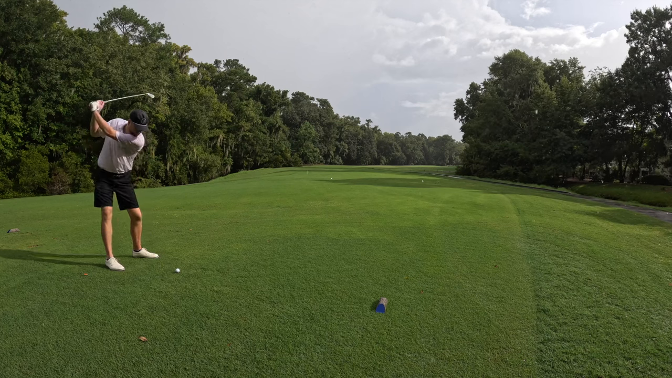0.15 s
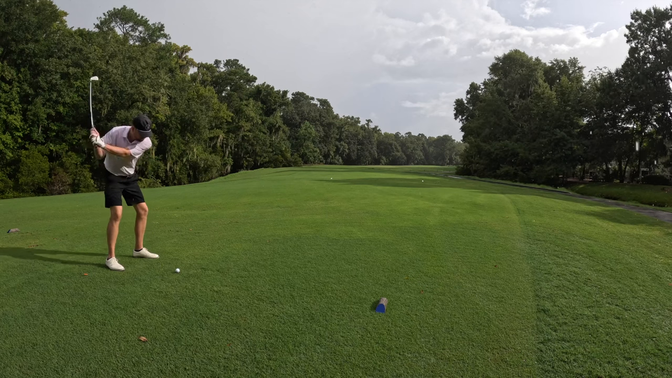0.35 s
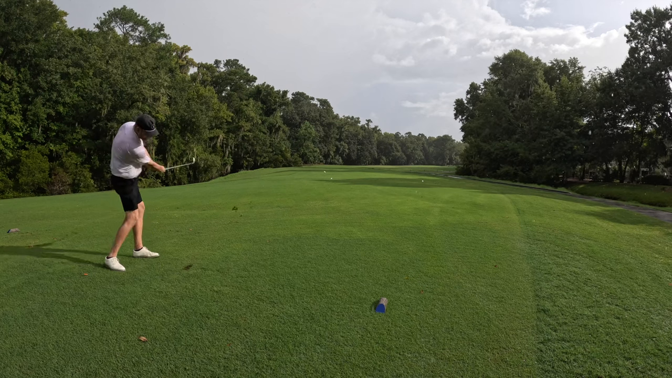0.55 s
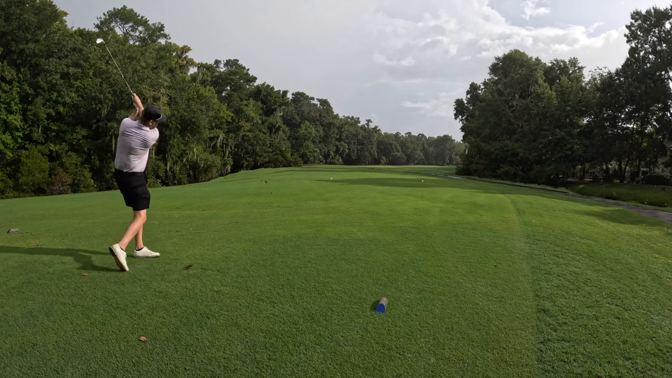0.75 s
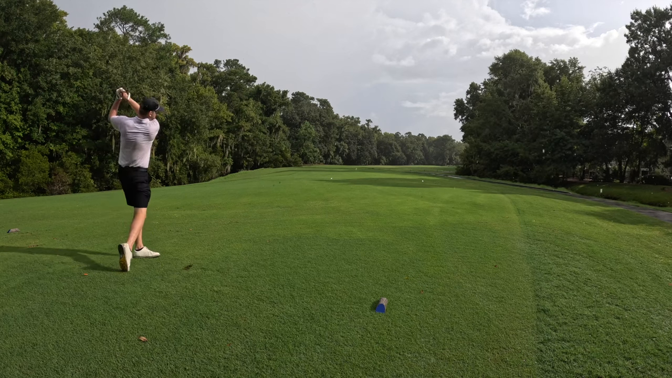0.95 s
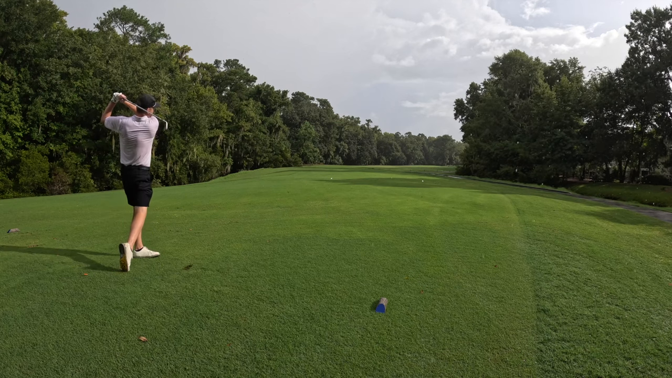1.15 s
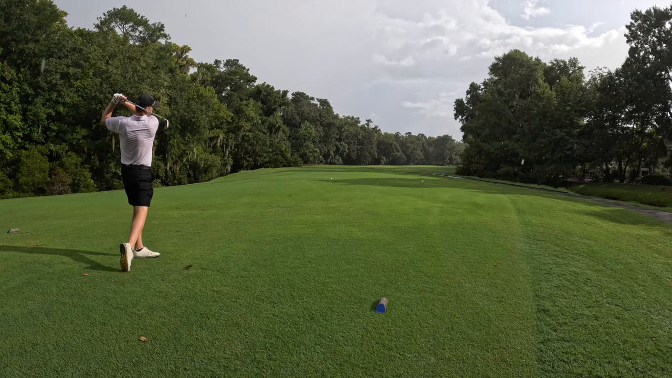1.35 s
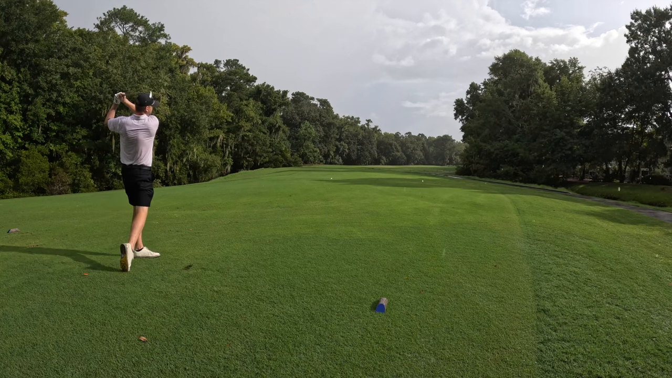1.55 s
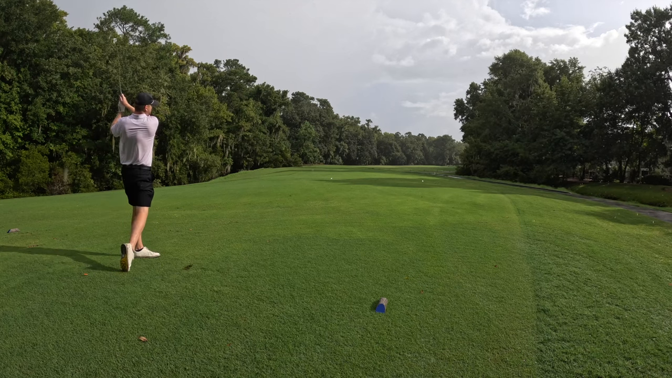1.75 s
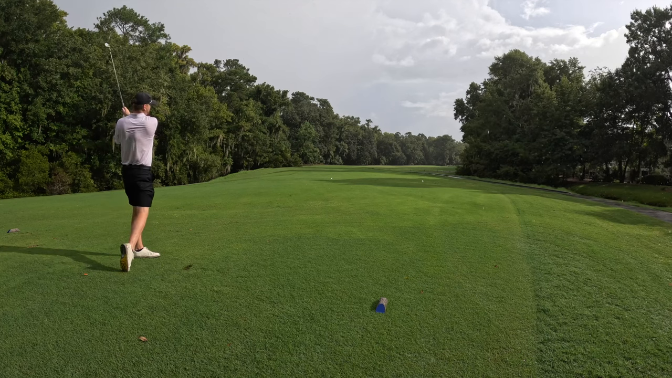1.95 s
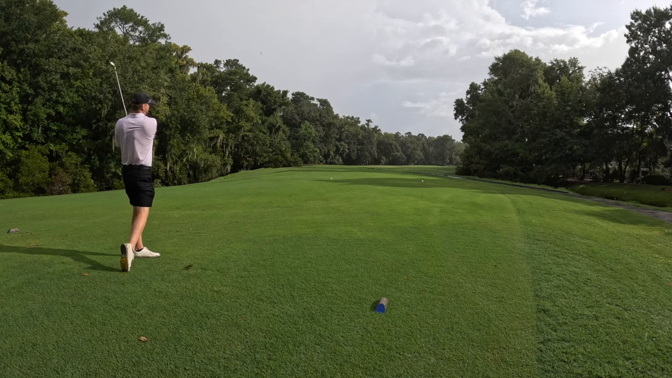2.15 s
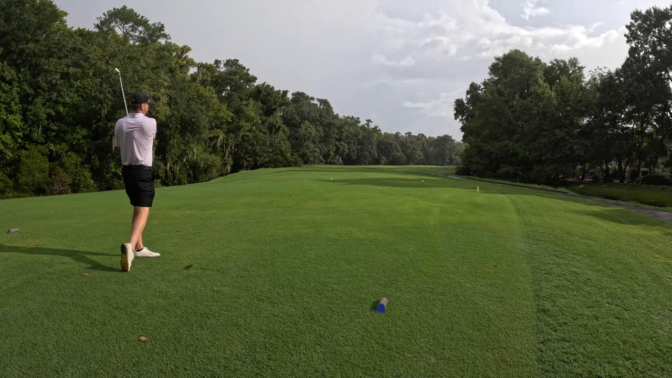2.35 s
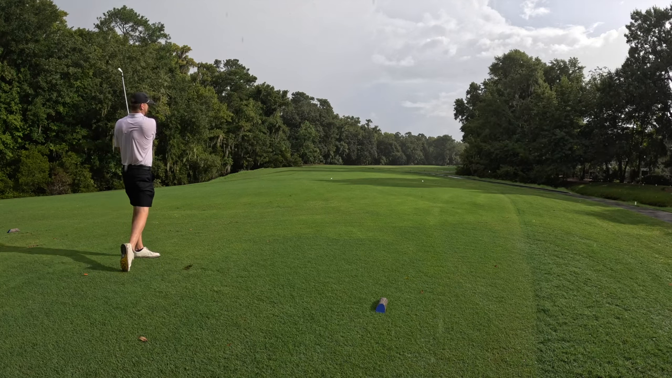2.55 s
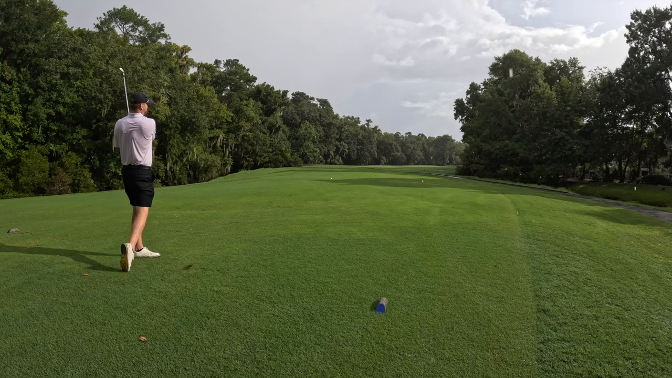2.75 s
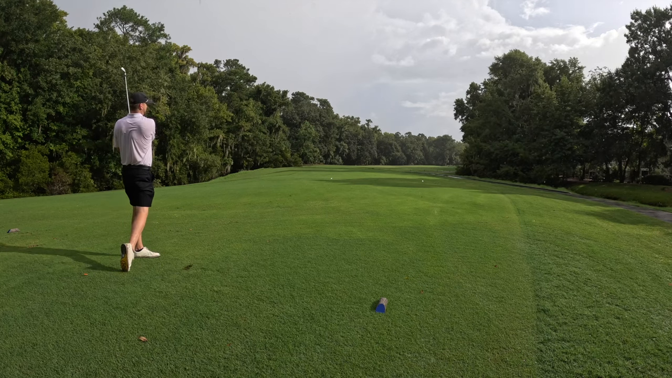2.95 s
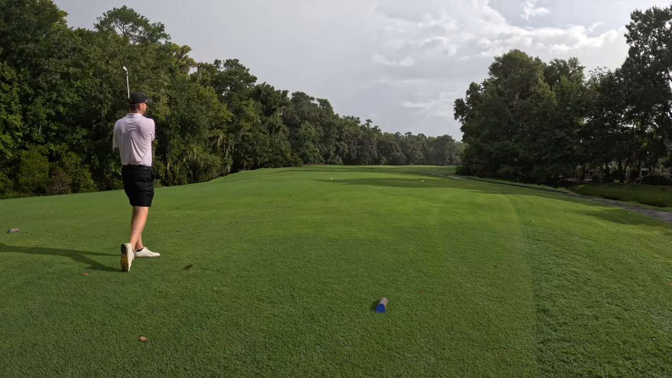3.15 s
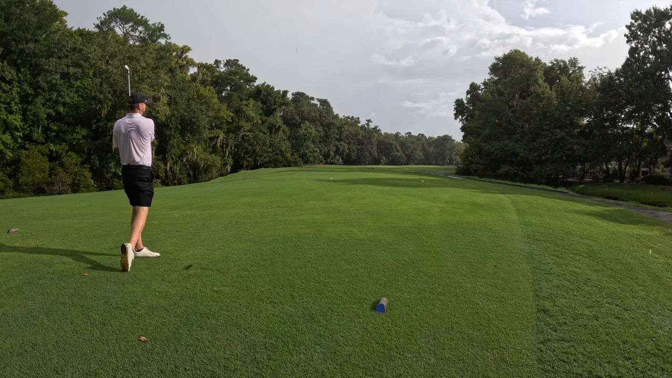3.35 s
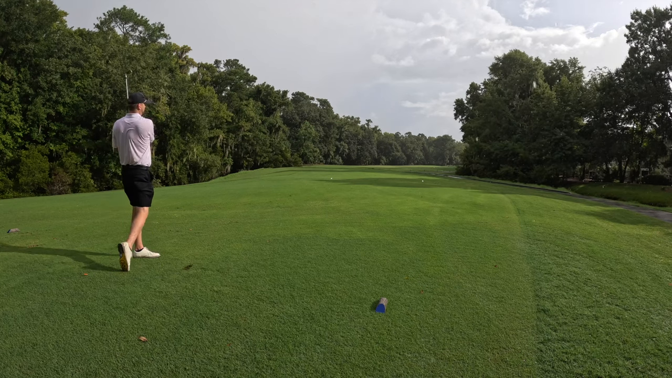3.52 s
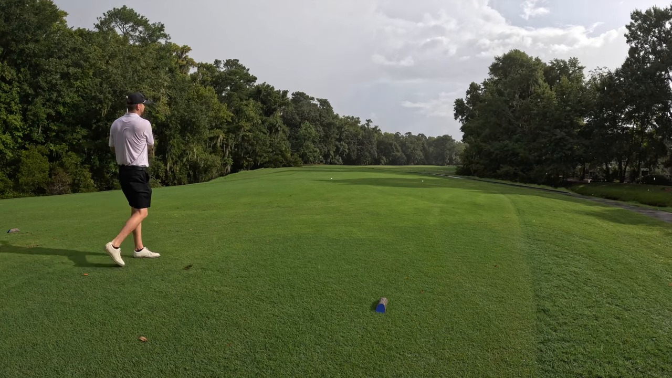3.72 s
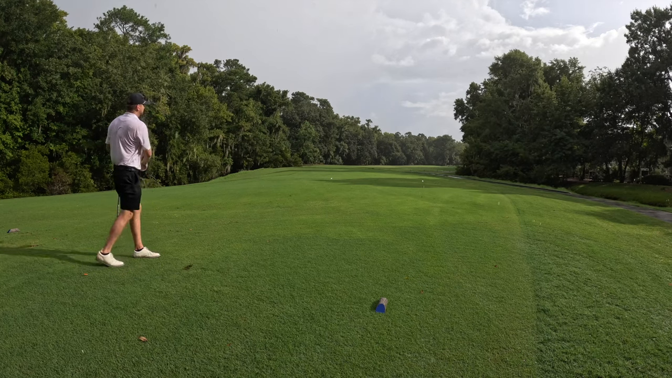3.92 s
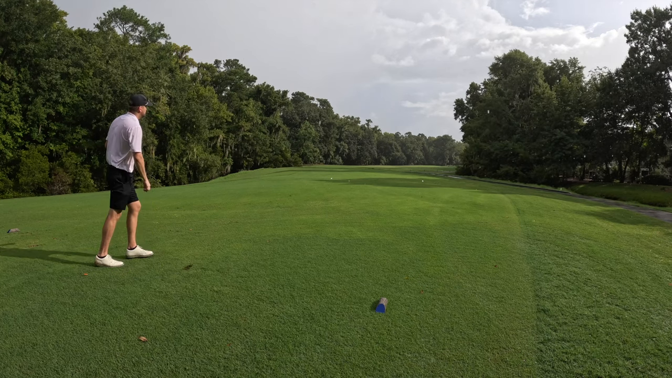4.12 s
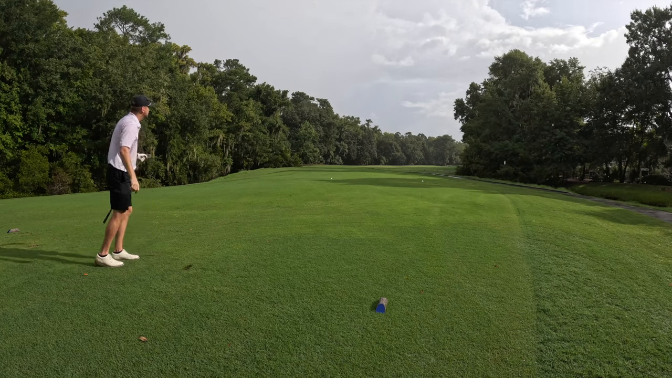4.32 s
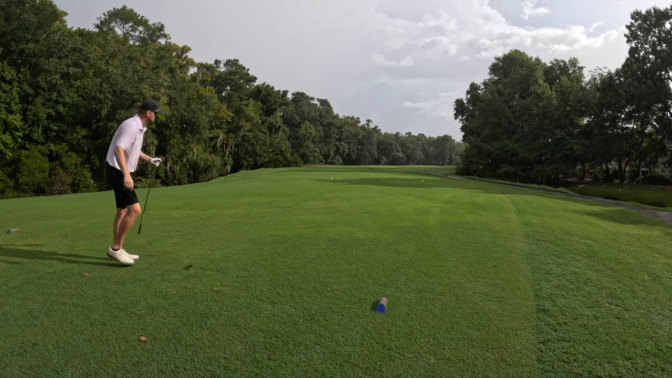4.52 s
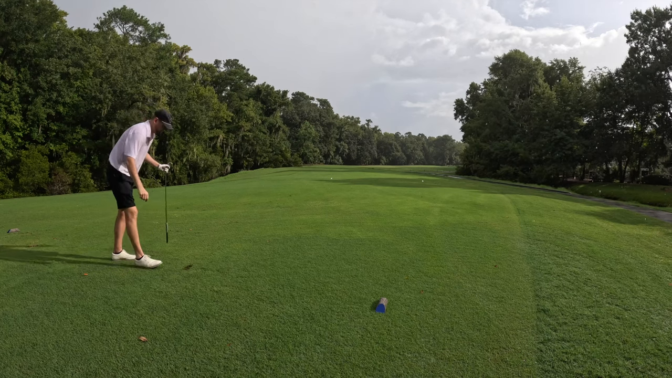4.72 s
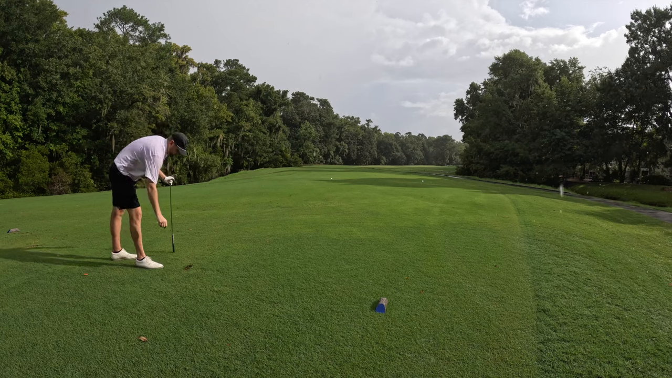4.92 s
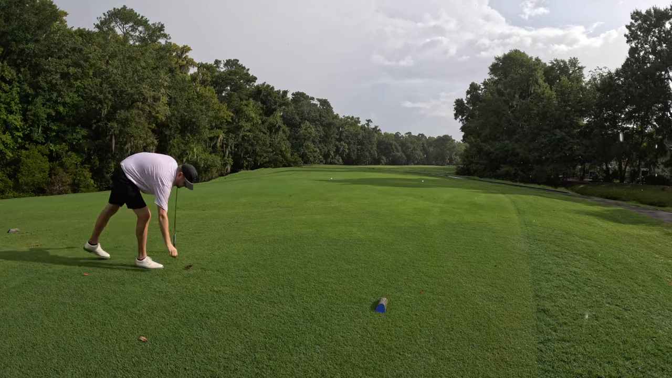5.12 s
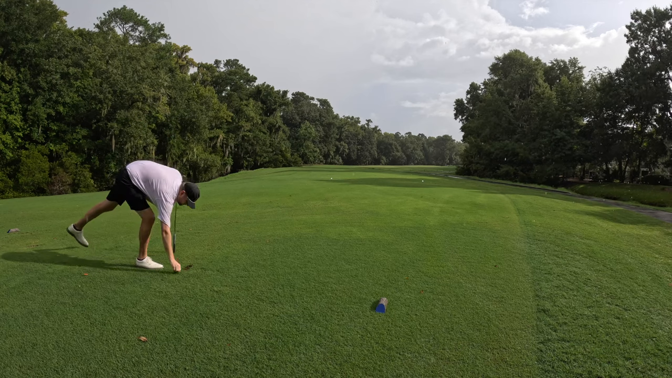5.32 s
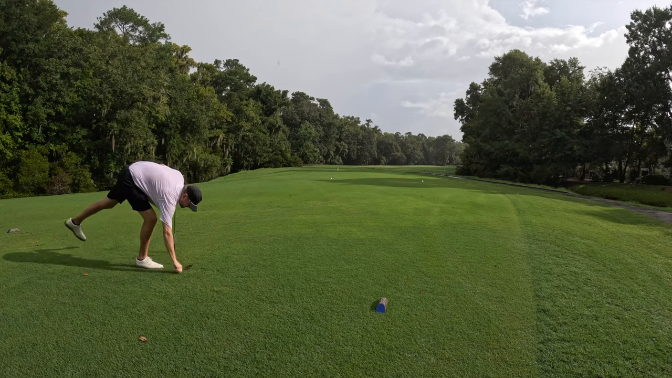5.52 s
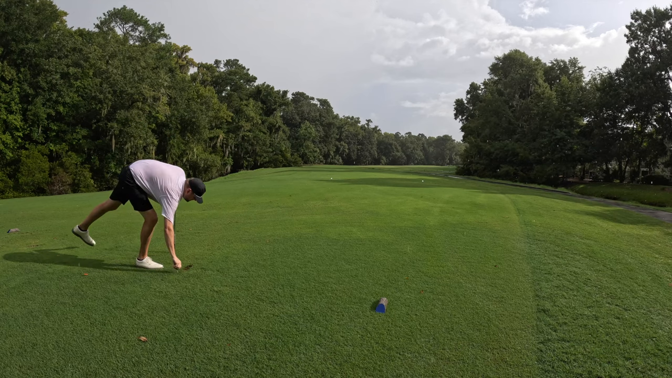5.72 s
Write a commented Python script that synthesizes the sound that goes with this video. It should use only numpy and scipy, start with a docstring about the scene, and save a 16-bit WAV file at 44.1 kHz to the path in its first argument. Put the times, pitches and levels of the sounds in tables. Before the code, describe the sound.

A golf club's quick swish and sharp strike echo off trees, over a low rumble, hissing leaves and faint birds.

```python
"""A golf tee shot on a tree-lined course, over a far rumble and the hiss of leaves.
A small bird chirps, a far crow caws, something ticks faintly. The iron whistles down, shedding
vortices; at 0.57 s its face cracks on the ball, the turf thumps and the trees throw the crack back.
The crow caws again. Scattered ticks, chirps and soft rustles follow.
From 4.7 s come dull thumps, as of feet on turf."""
import sys
import numpy as np
from scipy import signal
from scipy.fft import rfft, irfft
from scipy.io import wavfile
from scipy.ndimage import uniform_filter1d, minimum_filter1d

SR = 44100
rng = np.random.default_rng(int(sys.argv[2]) if len(sys.argv) > 2 else 0)


def materialize(psi):
    """Save the field psi as 16-bit PCM at rate SR to the path in sys.argv[1].

    A 1-D psi becomes a single channel; in a 2-D psi each row is a channel.
    """
    bounded = np.clip(np.atleast_2d(psi).T, -1, 1)
    quanta = np.round(bounded * 32767).astype(np.int16)
    wavfile.write(sys.argv[1], SR, quanta)


N = 254456
TIME_S, FREQS_HZ = np.arange(N) / SR, np.fft.rfftfreq(N, 1 / SR)
STRIKE_S = 0.5719

# Source spectra. Each row: frequency in Hz, relative level in dB.
RUMBLE_SPECTRUM = [(8.8, -36), (15, -8), (38, 0), (86, -1), (98, -4), (119, -7), (189, -11.5), (228, -25),
                   (300, -22.5), (390, -42), (660, -120)]
LEAF_SPECTRUM = [(120, -36), (200, 1), (223, -1.5), (294, -8), (322, -6), (394, -8.5), (432, -7),
                 (763, -8.5), (1040, -4), (2130, -8.5), (2290, -8.5), (7410, -17), (8250, -24),
                 (9700, -26.5), (11100, -38.5), (12400, -34.5), (15000, -44), (16000, -61)]
THROAT_SPECTRUM = [(300, -35), (650, -17), (1000, -5.5), (1230, 3), (1450, 2.5), (1780, 4), (2050, -40),
                   (2550, -30), (3000, -12), (3250, -16), (3560, -8.5), (3850, -20), (4300, -25),
                   (4900, -9), (5500, -11), (8000, -31), (11000, -60)]
TICK_SPECTRUM = [(2000, -10), (7300, 0), (10500, -14), (12500, -7), (16000, -26)]
SHAFT_SPECTRUM = [(150, -12), (500, 3.5), (1000, 6.5), (1600, 1), (2600, -3.5), (4000, -7.5),
                  (6500, -10.5), (9500, -20.5), (12000, -42), (16000, -48)]
GRASS_SPECTRUM = [(200, 10.5), (800, 2), (1500, 1), (2500, -5), (3500, 0), (5200, -4), (6300, 2),
                  (7200, -1), (9500, -2), (11500, -17), (15000, -24)]
EARTH_SPECTRUM = [(50, -8), (110, 5), (200, 9), (340, 1), (550, -32), (2000, -40), (8000, -90)]
ECHO_SPECTRUM = [(200, -1), (600, -1), (1500, 2), (2800, -3), (4300, 0), (5400, 1), (7000, -4.5),
                 (10000, -13), (12000, -26), (15000, -30)]
ECHO_TREBLE = [(5000, -40), (8500, -8), (11500, 0)]
RUSTLE_SPECTRUM = [(300, 4), (1200, 3), (4000, -11), (12000, -46)]
SCUFF_SPECTRUM = [(100, -4), (290, -1), (470, 0), (600, -1), (750, -26), (1000, -11), (1400, -16.5),
                  (3000, -28), (8000, -44), (14000, -70)]
CRUMBLE_SPECTRUM = [(40, -12), (70, 2), (110, 3), (195, 2.5), (300, -5.5), (400, -14.5), (1000, -43),
                    (4000, -80)]
# Rumble swells. Each row: centre in seconds, half-width in seconds, level in dB, band centre in Hz.
RUMBLE_SWELLS = [(1.713, .08, -45.5, 42), (2.55, 0.33, -53.5, 80), (3.35, .2, -51.5, 92),
                 (4.093, .14, -49.5, 88)]
# Band of a swell. Each row: ratio to the band centre, level in dB.
SWELL_BAND = [(0.25, -50), (0.5, -12), (1, 0), (2, -20), (4, -70)]
# Birds. Each row: start and length in seconds, relative level in dB, first, middle and last pitch in Hz.
BIRD_CHIRPS = [(.015, 0.025, -60, 7100, 6980, 6600), (1.523, 0.029, -54, 5700, 7470, 8000),
               (2.145, 0.013, -53, 5900, 7100, 7840), (3.67, 0.095, -57.5, 7400, 7500, 7520),
               (3.75, 0.047, -55.5, 7500, 7750, 8000), (3.792, 0.011, -56, 7900, 7600, 7300),
               (3.876, 0.037, -53.5, 7350, 7130, 6900), (3.895, 0.065, -51.5, 7170, 7180, 7100),
               (3.947, .02, -55, 7000, 6700, 6500), (4.736, .035, -58, 7000, 7600, 7540)]
# Crow. Each row: start and length in seconds, level in dB, base pitch in Hz, roughness from 0 to 1.
CROW_CAWS = [(0.085, .115, -44, 616.5, 0.05), (0.714, 0.124, -44, 613, 0)]
# Ticks. Each row: start in seconds, gain in dB, relative level of the lower mode in dB.
DRY_TICKS = [(.391, -52, 6), (1.482, -43, 3), (2.608, -40, -2), (2.811, -44, 1.5), (4.397, -49, -12),
             (4.596, -40, 2.5), (4.907, -46, -8), (4.924, -47, -8), (5.538, -43.5, 2.5)]
# Club face snapping, ball springing back. Each row: frequency in Hz, level in dB, rise in seconds.
FACE_MODES = [(2780, -1, 0.00019), (5430, 2, 0.00028), (7060, 1.5, 0.0004), (8740, -5, 0.0003),
              (10200, -14, 0.00044), (12240, -15.5, 0.00033), (14100, -22.5, 0.00027)]
BALL_MODES = [(1380, 3.5, 0.0002)]
# Head and ball ringing on. Each row: frequency in Hz, relative level in dB, T60 in seconds.
RING_MODES = [(947, -9, .035), (1265, -.5, .025), (1700, 0, .026), (1830, -3, .02), (1960, 0, .022),
              (2460, -1, .028), (2860, -6, .03), (3110, -7, .022), (4010, -1, .025), (4270, -4, .028),
              (4760, -5, .022), (4990, 1, .026), (5430, -5, .02), (6982, -2, .026), (7500, -7, .028),
              (9130, -4, .022)]
# Turf giving way, sole slapping it. Each: level in dB, first and last Hz, glide and rise in seconds.
TURF_THUD = (-22.5, 280, 112, .006, .009)
SOLE_SLAP = (-19, 460, 250, .006, .0027)
# Rustles. Each row: start in seconds, level in dB, rise in seconds.
SOFT_RUSTLES = [(2.81, -44.5, 0.0034), (3.075, -47, 0.004), (5.054, -49.5, 0.0075), (5.43, -41.5, .0035),
                (5.617, -48, .005)]
# Thumps. Each row: start in seconds, level in dB, relative scuff level in dB,
# thud lag and rise in seconds, last pitch in Hz.
DULL_THUMPS = [(4.682, -34.5, -4, 0.001, .016, 150.7), (4.953, -47.5, -1.5, 0.0019, 0.013, 218),
               (5.427, -30, -9.5, 0.015, 0.0058, 148), (5.469, -38.5, -12, 0.00094, 0.0054, 170),
               (5.491, -29, -13.5, 0.002, 0.007, 128), (5.528, -40.5, -12, .001, .005, 175),
               (5.615, -46.5, -2.5, 0.0021, 0.0066, 211)]
# Diffuse sound. Each row: frequency in Hz, left-right coherence from 0 to 1.
DIFFUSE_COHERENCE = [(60, 1), (130, 0.96), (290, 0.89), (640, 0.77), (1410, 0.65), (3100, 0.46), (6820, 1),
                     (15000, 0.22)]
# Balance of diffuse sound and of sound from the tee. Each row: frequency in Hz, left minus right in dB.
DIFFUSE_LEAN_DB = [(60, -0.5), (150, -1.5), (380, -1), (950, 1.0), (2380, 1.5), (5980, -0.5), (15000, 6.5)]
TEE_LEAN_DB = [(60, -1), (200, -1), (1300, 0), (7100, 2), (8300, -3), (10300, 1), (12500, 6)]
# Phase of sound from the tee. Each row: frequency in Hz, lead of the left channel in radians.
TEE_PHASE_RAD = [(1000, 0.23), (4000, -0.42), (5900, -0.48), (7200, -0.39), (9000, -0.53), (11000, -0.13)]


def amp(db):
    """Decibels to gain."""
    return 10 ** (np.asarray(db) / 20)


def unit(x):
    """Scales to rms 1."""
    return x / np.sqrt(np.mean(x ** 2) + 1e-20)


def per_bin(table):
    """A table interpolated at each FFT bin, in log frequency."""
    hz, value = np.transpose(table)
    return np.interp(np.log(FREQS_HZ + 1), np.log(hz + 1), value)


def add(mix, start_s, sound):
    """Mixes a sound in."""
    part = mix[max(round(start_s * SR), 0):][:len(sound)]
    part += sound[:len(part)]


def colour(x, spectrum):
    """Filters by a spectrum table."""
    return irfft(rfft(x) * amp(per_bin(spectrum)), N)


def noise(spectrum):
    """Coloured noise, rms 1."""
    return unit(colour(rng.standard_normal(N), spectrum))


def wander(rate_hz):
    """Smooth random motion, rms 1."""
    return unit(irfft(rfft(rng.standard_normal(N)) * np.exp(-(FREQS_HZ / rate_hz) ** 2), N))


def bell(centre_s, width_s):
    """Gaussian rise and fall."""
    return np.exp(-((TIME_S - centre_s) / width_s) ** 2)


def swell(t, rise_s):
    """Rises to 1, then decays."""
    return t / rise_s * np.exp(1 - t / rise_s)


def release(start_s, t60_s):
    """Holds 1, then decays."""
    return amp(-60 * np.maximum(TIME_S - start_s, 0) / t60_s)


def bandpass(x, hz, width_hz):
    """Two resonators in series; hz may be a curve."""
    carrier = np.exp(2j * np.pi * np.cumsum(hz * np.ones(N)) / SR)
    pole = np.exp(-np.pi * width_hz / SR)
    for _ in range(2):
        x = 2 * (carrier * signal.lfilter([1 - pole], [1, -pole], x / carrier + 1e-18)).real
    return x


def knock(modes):
    """Heavily damped modes, each (Hz, dB, rise in seconds)."""
    t = np.arange(SR // 2) / SR
    return -sum(amp(db) * swell(t, rise_s) * np.sin(2 * np.pi * hz * t) for hz, db, rise_s in modes)


def puff(spectrum, rise_s):
    """Noise burst, rms 1 at its crest."""
    shape = swell(np.arange(SR // 2) / SR, rise_s)
    return unit(noise(spectrum)[:len(shape)] * shape) * np.sqrt(np.mean(shape ** 2))


def thud(db, first_hz, last_hz, glide_s, rise_s):
    """Soft ground gives way: pitch falls as the blow spreads."""
    t = np.arange(SR // 2) / SR
    hz = last_hz + (first_hz - last_hz) * np.exp(-t / glide_s)
    return amp(db) * swell(t, rise_s) * np.sin(2 * np.pi * np.cumsum(hz) / SR)


def pan(x, left_db):
    """Stereo, leaning left by left_db."""
    return x * amp([[left_db / 2], [-left_db / 2]])


def diffuse(a, b):
    """Sound from all around: channels agree in the bass, less in the treble."""
    coherence = np.clip(per_bin(DIFFUSE_COHERENCE), 0, 1)
    lean = amp(per_bin(DIFFUSE_LEAN_DB) / 2)
    mid = rfft(a) * np.sqrt((1 + coherence) / 2)
    side = rfft(b) * np.sqrt((1 - coherence) / 2)
    return irfft(np.array([(mid + side) * lean, (mid - side) / lean]), N)


def from_tee(x):
    """A near source reaches two microphone ports with different colour and phase."""
    left = amp(per_bin(TEE_LEAN_DB) / 2) * np.exp(0.5j * per_bin(TEE_PHASE_RAD))
    return irfft(rfft(x) * np.array([left, 1 / left]), N)


def woods(x, t60_s, build_s):
    """Scatter from many trunks: a tail that builds and decays."""
    t = np.arange(SR) / SR
    tail = rng.standard_normal((2, SR)) * (1 - np.exp(-t / build_s)) * amp(-60 * t / t60_s)
    tail /= np.linalg.norm(tail[0])
    return diffuse(*signal.fftconvolve(x[None], tail, axes=1)[:, :N])


def outdoors(rumble_db=-48, drift_db=1.7, leaves_db=-48.5, flutter_db=0.62):
    """Far rumble, swelling at times, under the hiss of leaves and insects."""
    swells = np.zeros(N)
    for centre_s, width_s, db, hz in RUMBLE_SWELLS:
        band = noise([(ratio * hz, band_db) for ratio, band_db in SWELL_BAND])
        swells += amp(db) * bell(centre_s, width_s) * band
    rumble = diffuse(noise(RUMBLE_SPECTRUM), noise(RUMBLE_SPECTRUM))
    rumble *= amp(rumble_db + drift_db * wander(5.2))
    leaves = diffuse(noise(LEAF_SPECTRUM), noise(LEAF_SPECTRUM))
    leaves *= amp(leaves_db + flutter_db * wander(14.4))
    return rumble + pan(swells, -0.8) + leaves


def songbirds(wet_db=-3.5, waver=0.0035, flutter_db=2.5):
    """Thin gliding, fluttering whistles with a tail from the trees."""
    dry = np.zeros(N)
    for start_s, length_s, db, *pitches_hz in BIRD_CHIRPS:
        progress = np.linspace(0, 1, int(length_s * SR))
        n = len(progress)
        hz = np.interp(progress, [0, 0.5, 1], pitches_hz) * (1 + waver * wander(200)[:n])
        level = amp(db + flutter_db * wander(130)[:n]) * np.sin(np.pi * progress)
        add(dry, start_s, level * np.sqrt(2) * np.sin(2 * np.pi * np.cumsum(hz) / SR))
    return pan(0.75 * dry, -0.7) + amp(wet_db) * woods(dry, t60_s=0.7, build_s=0.014)


def crow(scoop=0.073, sag=0.057, jitter=0.0044, grate_s=0.032, growl_hz=115, growl_depth=0.49,
         tone_lag_s=0.08, tone_hz=1360, echo_s=0.2):
    """Each caw grates, clears to a near-level pitch and sags; a narrow, distant tone lingers after it."""
    dry, hoarse = np.zeros(N), np.zeros(N)
    for start_s, length_s, db, hz, roughness in CROW_CAWS:
        progress = np.clip((TIME_S - start_s) / length_s, 0, 1)
        grate = bell(start_s, grate_s)
        cycles = np.cumsum(hz * (1 - scoop * grate - sag * progress ** 3 + jitter * wander(180))) / SR
        harmonics = sum(np.cos(2 * np.pi * k * cycles) for k in range(1, 12))
        voice = unit(colour(harmonics, THROAT_SPECTRUM))
        growl = 1 + growl_depth * np.cos(2 * np.pi * growl_hz * TIME_S)
        rasp = unit(noise(THROAT_SPECTRUM) * growl)
        rasp_share = np.clip(roughness + (1 - roughness) * (grate + progress ** 6), 0, 1)
        effort = amp(db) * (4 * progress * (1 - progress)) ** 0.22
        dry += effort * (np.sqrt(1 - rasp_share) * voice + np.sqrt(rasp_share) * rasp)
        hoarse += effort * rasp
    band = bandpass(hoarse, tone_hz, width_hz=115)
    tone = unit(np.interp(TIME_S - tone_lag_s, TIME_S, band, left=0)) * np.std(dry)
    echo = np.interp(TIME_S - echo_s, TIME_S, hoarse, left=0)
    wet = amp(-6) * woods(hoarse, t60_s=0.69, build_s=0.045)
    wet += amp(0.3) * woods(tone, t60_s=1.0, build_s=0.033)
    wet += amp(-4.5) * woods(echo, t60_s=0.32, build_s=0.0057)
    return pan(dry, -4.5) + pan(wet, -4)


def ticks(low_hz=7050, high_hz=12500, edge_db=-16, edge_s=0.00072):
    """Tiny dry clicks: two bright modes and a noisy edge."""
    out = np.zeros(N)
    for start_s, db, low_db in DRY_TICKS:
        click = knock([(low_hz, low_db, 0.0001), (high_hz, -10, 0.00015)])
        edge = amp(edge_db) * puff(TICK_SPECTRUM, edge_s)
        add(out, start_s, amp(db) * (click + edge))
    return pan(out, 19)


def swish(level_db=-27.5, lead_s=0.034, rise_s=0.023, fall_s=0.042, impact_hz=690, climb_hz_per_s=4100,
          shaft_db=-5, whistle_share=0.35, waver=0.065):
    """The head sheds vortices, pitch rising with speed; the shaft hisses. The strike stops both."""
    peak_s = STRIKE_S - lead_s
    hz = np.maximum(impact_hz - climb_hz_per_s * np.maximum(STRIKE_S - TIME_S, 0), 0)
    envelope = bell(peak_s, np.where(TIME_S < peak_s, rise_s, fall_s)) * release(STRIKE_S, t60_s=0.048)
    fuzz = unit(bandpass(rng.standard_normal(N), hz, width_hz=220))
    whistle = np.sqrt(2) * np.sin(2 * np.pi * np.cumsum(hz * (1 + waver * wander(120))) / SR)
    vortices = np.sqrt(1 - whistle_share) * fuzz + np.sqrt(whistle_share) * whistle
    shaft = amp(shaft_db) * noise(SHAFT_SPECTRUM)
    return from_tee(amp(level_db) * envelope * (vortices + shaft))


def strike(ring_db=-12, smother_s=0.012, tear_db=-19, bits_db=-49, bits_t60_s=0.26, clump_db=4,
           ground_hz=58, ground_db=-34, earth_db=-36):
    """The face cracks on the ball and rings; the sole tears grass, throws bits and thumps the ground."""
    t, out = np.arange(SR // 2) / SR, np.zeros(N)
    crack = knock(FACE_MODES) - knock(BALL_MODES)
    ring = sum(amp(db - 60 * t / t60_s) * np.sin(2 * np.pi * (hz * t + rng.random()))
               for hz, db, t60_s in RING_MODES)
    ring *= np.minimum(t / 0.0021, 1) * np.exp(-(t / smother_s) ** 4)  # turf smothers the head
    tear = amp(tear_db) * swell(t, rise_s=0.0033)
    bits = amp(bits_db - 60 * t / bits_t60_s + clump_db * wander(400)[:len(t)])
    grass = noise(GRASS_SPECTRUM)[:len(t)] * (tear + bits)
    ground = thud(*TURF_THUD) + thud(*SOLE_SLAP) + knock([(ground_hz, ground_db, 0.055)])
    earth = amp(earth_db) * puff(EARTH_SPECTRUM, rise_s=0.014)
    add(out, STRIKE_S, crack + amp(ring_db) * ring + grass + ground + earth)
    return from_tee(out)


def tree_echo(level_db=-46, delay_s=0.018, build_s=0.11, hold_s=0.16, tail_db=-9.5, flutter_db=0.75,
              treble_db=7, air_db_per_s=32):
    """Leaves and trunks return the crack as a hiss; air dulls the later, farther returns."""
    start_s = STRIKE_S + delay_s
    end_s = start_s + build_s + hold_s
    age_s = np.maximum(TIME_S - start_s, 0)
    build = np.minimum(age_s / build_s, 1)
    fade = np.hypot(release(end_s, t60_s=0.87), amp(tail_db) * release(end_s, t60_s=3.5))
    hiss = diffuse(noise(ECHO_SPECTRUM), noise(ECHO_SPECTRUM))
    treble = colour(hiss, ECHO_TREBLE)
    hiss = hiss - treble + treble * amp(treble_db - air_db_per_s * age_s)
    return hiss * build * fade * amp(level_db + flutter_db * wander(60))


def rustles():
    """Short dry brushes of noise."""
    out = np.zeros(N)
    for start_s, db, rise_s in SOFT_RUSTLES:
        add(out, start_s, amp(db) * puff(RUSTLE_SPECTRUM, rise_s))
    return pan(out, 0)


def thumps(scuff_s=0.0094, crumble_db=-11):
    """A scuff, a falling thud, then the slower crumbling of soft ground."""
    out = np.zeros(N)
    for start_s, db, scuff_db, lag_s, rise_s, hz in DULL_THUMPS:
        add(out, start_s, amp(db + scuff_db) * puff(SCUFF_SPECTRUM, scuff_s))
        add(out, start_s + lag_s, thud(db, 1.69 * hz, hz, rise_s, rise_s))
        add(out, start_s + lag_s, amp(db + crumble_db) * puff(CRUMBLE_SPECTRUM, 1.6 * rise_s))
    return pan(out, -1.9)


def excess_db(x, ceiling_db, recovery_db_per_s):
    """Peak level above a ceiling, released at a steady rate."""
    peak_db = 20 * np.log10(abs(x).max(0) + 1e-9)
    fall_db = TIME_S * recovery_db_per_s
    held_db = np.maximum.accumulate(peak_db + fall_db) - fall_db
    return np.maximum(held_db - ceiling_db, 0)


def limiter(x):
    """Catches the crack and briefly ducks what follows."""
    over_db = excess_db(x, ceiling_db=-0.1, recovery_db_per_s=130)
    gain_db = minimum_filter1d(-over_db, size=89)  # 1 ms look-ahead
    return x * amp(uniform_filter1d(gain_db, size=45))


def gain_control(x, share=0.2, attack_s=0.022):
    """Turns down a little after a loud sound, then creeps back."""
    over_db = excess_db(x, ceiling_db=-14, recovery_db_per_s=8)
    pole = np.exp(-1 / (attack_s * SR))
    return x * amp(-share * signal.lfilter([1 - pole], [1, -pole], over_db))


def scene():
    """The course and the tee shot."""
    return (outdoors() + songbirds() + crow() + ticks()
            + swish() + strike() + tree_echo() + rustles() + thumps())


def record(dry, cutoff_hz=16100):
    """Limiter, gain control, low-pass."""
    lowpass = signal.firwin(511, cutoff_hz, window=("kaiser", 9), fs=SR)
    return signal.oaconvolve(gain_control(limiter(dry)), lowpass[None], "same")


dry = scene()
out = record(dry)
materialize(out)
```